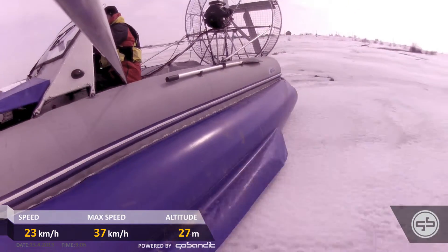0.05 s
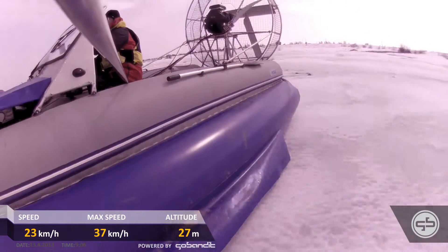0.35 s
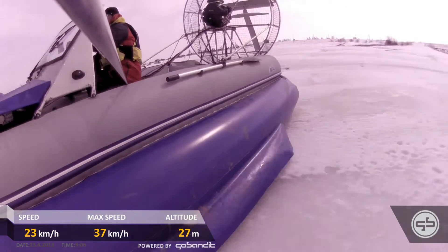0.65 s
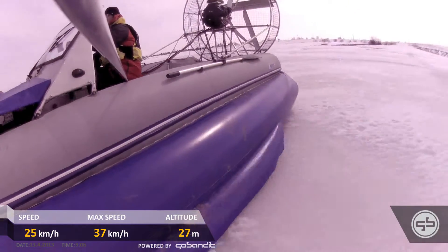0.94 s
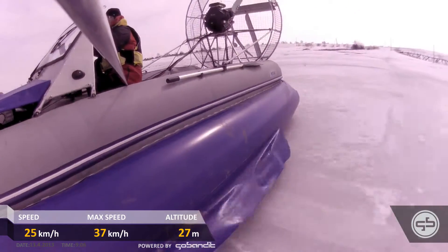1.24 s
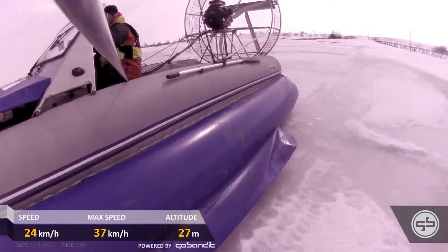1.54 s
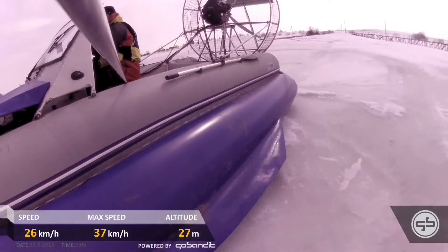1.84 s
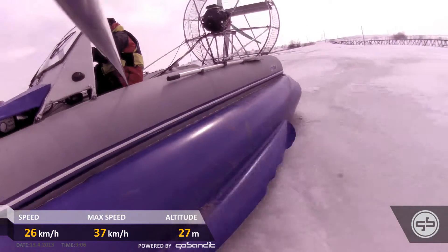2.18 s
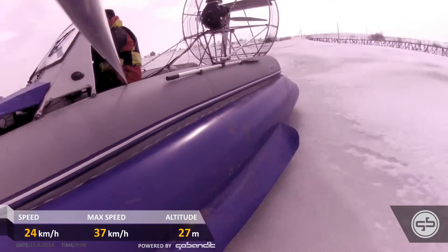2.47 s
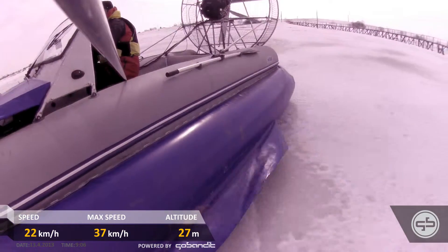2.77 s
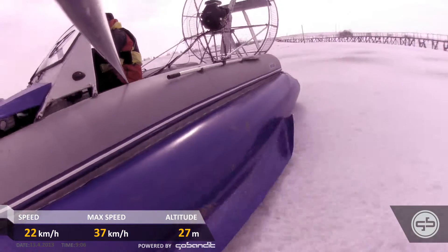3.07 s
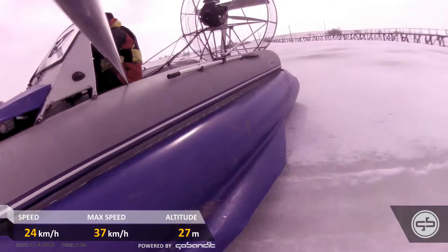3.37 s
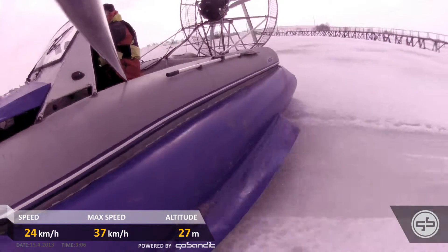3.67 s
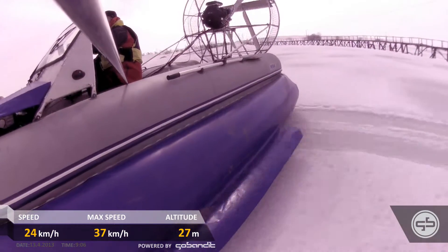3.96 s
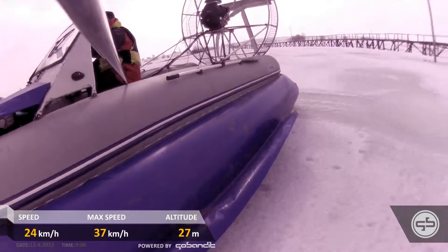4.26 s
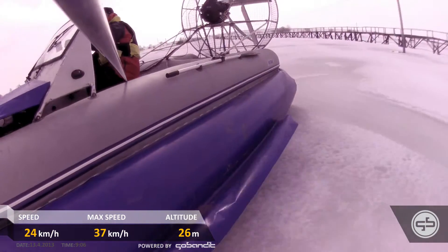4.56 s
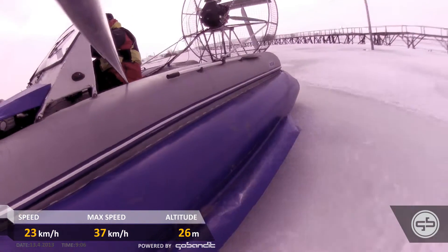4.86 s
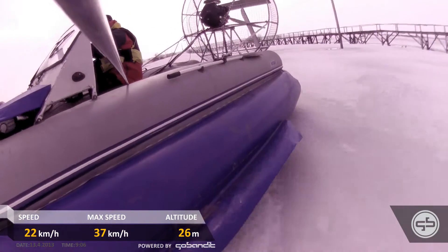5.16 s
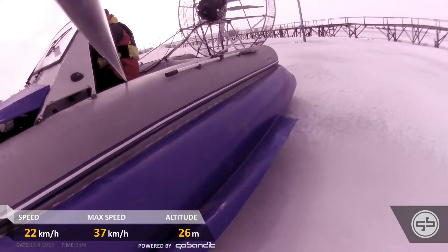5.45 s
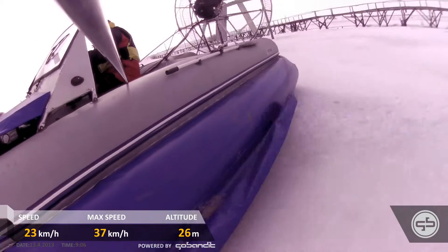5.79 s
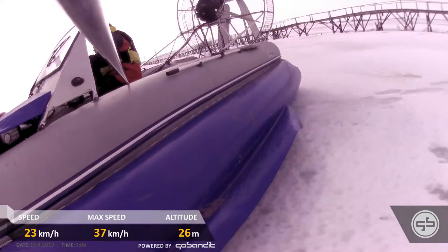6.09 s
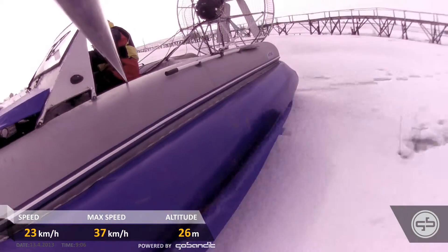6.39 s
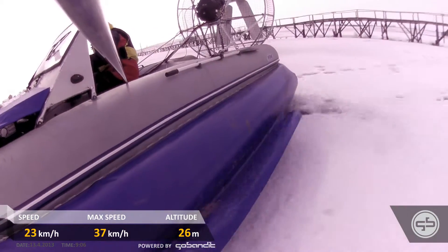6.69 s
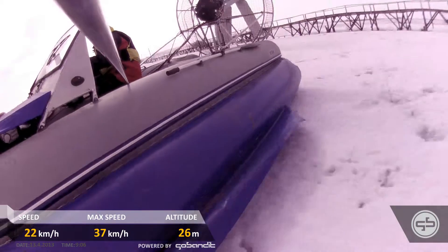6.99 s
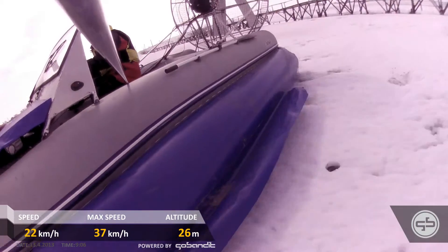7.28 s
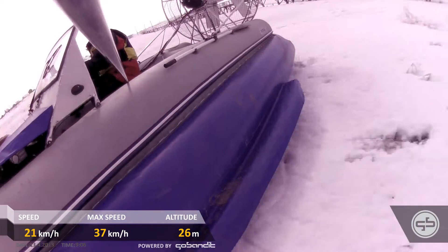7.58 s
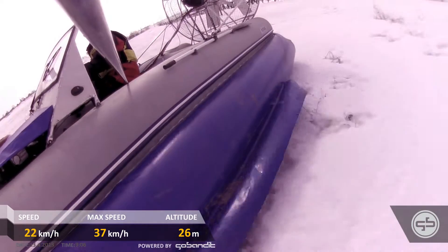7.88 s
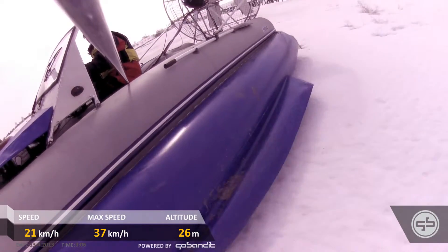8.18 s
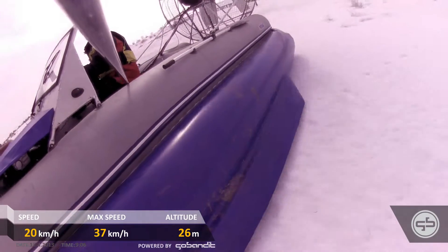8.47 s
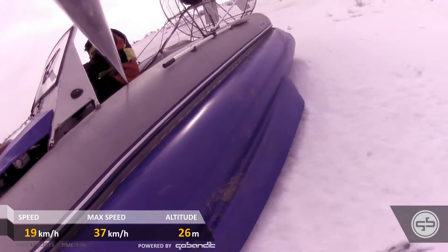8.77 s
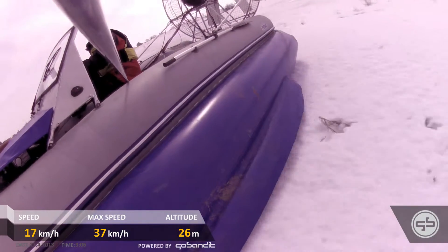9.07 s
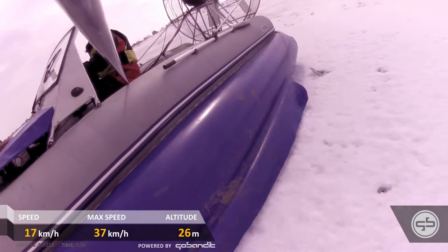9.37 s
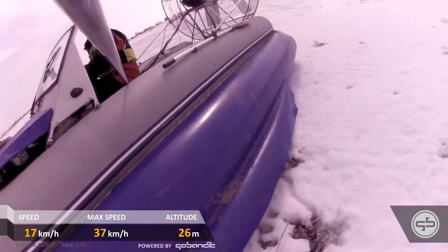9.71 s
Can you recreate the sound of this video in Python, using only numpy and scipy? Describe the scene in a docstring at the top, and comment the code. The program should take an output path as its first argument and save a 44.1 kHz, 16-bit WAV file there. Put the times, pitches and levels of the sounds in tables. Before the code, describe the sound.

A hovercraft's engine and propeller drone loudly and steadily while its skirt flutters and scrapes over ice and snow, with rattles and bumps.

```python
"""A hovercraft runs at steady throttle over ice and crusted snow, heard from a cased camera on its side.
From the start, engine and propeller drone, air buffets the hull and the skirt flutters on smooth ice.
The loose camera mount rattles, and from 1 s bumps jolt it; a limiter ducks everything after hard ones.
Just after 5 s the flutter dies away and the skirt scrapes over snow, where the bumps come thickest.
By 8 s the snow has thinned, and the drone carries on to the end."""
import sys
import numpy as np
from scipy import signal
from scipy.fft import rfft, irfft, next_fast_len
from scipy.io import wavfile
from scipy.ndimage import uniform_filter1d, minimum_filter1d

SR = 44100
rng = np.random.default_rng(int(sys.argv[2]) if len(sys.argv) > 2 else 0)


def waveform_to_disk(signal):
    """Save audio, clipped to [-1, 1], as 16-bit WAV at the path in sys.argv[1]."""
    frames = np.transpose(np.atleast_2d(signal))
    scaled = np.clip(frames, -1, 1) * 32767
    samples = np.round(scaled).astype(np.int16)
    wavfile.write(sys.argv[1], SR, samples)


N = 438354


def from_db(db):
    """Logarithmic level: 20 dB is a factor of ten in amplitude."""
    return 10 ** (np.asarray(db) / 20)


def unit_power(x):
    """Normalisation to a mean square of 1."""
    return x / np.sqrt(np.mean(x ** 2) + 1e-20)


def in_time(rows):
    """Linear interpolation of each column of a curve at every sample."""
    times, *columns = np.transpose(rows)
    return [np.interp(np.arange(N) / SR, times, column) for column in columns]


def drift(rate_hz):
    """Random modulation: low-passed noise with a spread of 1."""
    pole = np.exp(-80 * np.pi * rate_hz / SR)   # one step per 40 samples
    slow = signal.lfilter([1], [1, -2 * pole, pole * pole], rng.standard_normal(N // 40 + 2002))[2000:]
    return np.interp(np.arange(N) / 40, np.arange(len(slow)), unit_power(slow))


def coloured(x, spectrum):
    """Spectral shaping to unit power, falling 12 dB per octave beyond the ends of the spectrum."""
    size = next_fast_len(N)
    hz, db = np.transpose(spectrum)
    bins = np.maximum(np.arange(size // 2 + 1) * SR / size, 1)
    gain = from_db(np.interp(np.log(bins), np.log(hz), db))
    rolloff = np.minimum(bins / hz[0], 1) ** 2 * np.minimum(hz[-1] / bins, 1) ** 2
    return unit_power(irfft(rfft(x, size) * gain * rolloff, size)[:N])


def grains(per_s, spread_db):
    """Shot noise: random clicks of uneven size and sign."""
    sizes = from_db(spread_db * np.minimum(rng.exponential(1, N), 4)) * rng.choice([-1, 1], N)
    return sizes * (rng.random(N) < per_s / SR)


def ring(clicks, hz, t60_s):
    """Damped resonance: each click starts a decaying sine."""
    decay, angle = from_db(-60 / (t60_s * SR)), 2 * np.pi * hz / SR
    return signal.lfilter([0, np.sin(angle)], [1, -2 * decay * np.cos(angle), decay ** 2], clicks + 1e-18)


def swell(start, end, attack_s, release_s):
    """Exponential growth and decay on either side of a hold at 1 from start to end."""
    t = np.arange(N) / SR
    return np.exp(np.clip(np.minimum((t - start) / attack_s, (end - t) / release_s), -30, 0))


def around(events, attack_s, release_s):
    """Upper envelope of brief swells, one at each event."""
    out = np.zeros(N)
    for time_s, _ in events:
        out = np.maximum(out, swell(time_s, time_s, attack_s, release_s))
    return out


FIRINGS_PER_CYCLE = 6
# Engine speed, nearly steady: time_s, firing_hz
ENGINE_SPEED = [(0, 123.2), (.7, 123.7), (2.1, 123.6), (3.7, 123.25), (7.3, 123.2), (8.3, 124.2),
                (8.9, 124.25), (9.93, 123.6)]
def engine_cycles():
    """Phase as the integral of frequency: the count of engine cycles so far."""
    firing_hz, = in_time(ENGINE_SPEED)
    return np.cumsum(firing_hz) / SR / FIRINGS_PER_CYCLE


# Engine load, heard in the firing tone: time_s, level_db
ENGINE_LOAD = [(0, -18.5), (.3, -26), (1.35, -15.5), (2.1, -20.5), (3.1, -17.5), (3.6, -22.5),
               (4.12, -16.5), (4.9, -23), (5.9, -16), (6.27, -23.5), (6.95, -17.5), (8.1, -19),
               (9.93, -15.5)]
# Engine and propeller tones, topped by a faint whine: cycle_multiple, relative_db
ENGINE_ORDERS = [(1, -34), (2, -2), (3, -5), (4, -0.5), (5, -11.5), (6, 1), (7, -19.5), (8, -16),
                 (9, -15.5), (10, -13), (11, -8.5), (12, -21.5), (18, -27.5), (20, -34.5), (60, -39.5),
                 (72, -53)]
def engine(cycles, gain_db, waver, roughness, load_share):
    """Harmonics of one shaft: load swells the firing tone most, turbulent inflow shakes the high ones."""
    load_db, = in_time(ENGINE_LOAD)
    swing_db = load_db - load_db.mean()
    out = np.zeros(N)
    for multiple, db in ENGINE_ORDERS:
        phase = 2 * np.pi * (multiple * cycles + rng.random())
        unsteady = waver + roughness * multiple / FIRINGS_PER_CYCLE
        tone = (1 + unsteady * drift(3.5)) * np.sin(phase) + unsteady * drift(3.7) * np.cos(phase)
        follows = 1 if multiple == FIRINGS_PER_CYCLE else load_share
        out += from_db(db + follows * swing_db) * tone
    return np.sqrt(2) * from_db(load_db.mean() + gain_db) * out


# Spells of flapping on smooth ice: start_s, end_s, first_hz, last_hz, level_db
FLUTTER_SPELLS = [(0, 0.583, 35, 44, -11.5), (1.503, 2.605, 46, 28, -17), (3.15, 3.7, 34, 43, -11),
                  (4.244, 5.053, 40.5, 43, -10)]
def skirt_flutter(octave_db, waver_db):
    """Flutter: the rubber hem oscillates almost as a sine, with a weak octave."""
    out = np.zeros(N)
    for start, end, first_hz, last_hz, db in FLUTTER_SPELLS:
        flap_hz, = in_time([(start, first_hz), (end, last_hz)])
        phase = 2 * np.pi * np.cumsum(flap_hz) / SR
        flaps = np.sin(phase) + from_db(octave_db) * np.sin(2 * phase)
        out += from_db(db) * swell(start, end, attack_s=0.11, release_s=0.14) * flaps
    return np.sqrt(2) * from_db(waver_db * drift(8.6)) * out


# Spectrum of air on the hull: frequency_hz, density_db
BUFFET_SPECTRUM = [(18, 2.5), (30, -8), (48, -2), (65, -1.5), (80, -4.5), (100, -14), (140, -11),
                   (200, -23.5), (400, -37.5)]
def air_buffet(level_db, gust_db):
    """Pressure fluctuation: air on the hull makes a low rumble that swings slowly in level."""
    return from_db(level_db + gust_db * drift(2.6)) * coloured(rng.standard_normal(N), BUFFET_SPECTRUM)


# Ice giving way to crusted snow: time_s, snow_fraction
SNOW_FRACTION = [(5.1, 0), (5.4, 0.84), (7.3, 0.72), (8.1, 0.22)]
# How hard the skirt drags on the ground: time_s, drag_db
SKIRT_DRAG = [(0, 9), (.08, -3), (.5, -5), (.85, 1), (1.3, 1.5), (1.8, 1), (2.08, -6.5), (2.3, 0.5),
              (2.85, -1), (4.1, -.5), (5.1, -4), (5.33, 8.5), (5.55, 3), (6.2, 5.5), (6.45, 1.5),
              (7.88, 0.5), (8.03, -4), (8.4, 0.5), (9.93, 0.5)]
def ground_level(ice_db, snow_change_db, drag_share):
    """Contact excitation: a level in dB that follows the snow cover and the drag of the skirt."""
    cover, = in_time(SNOW_FRACTION)
    drag_db, = in_time(SKIRT_DRAG)
    return ice_db + snow_change_db * cover + drag_share * drag_db


# Ridges of snow under the skirt: time_s, rise_db
SNOW_RIDGES = [(.02, 7.5), (.92, 3.5), (1.33, 9), (1.8, 7), (2.31, 5), (2.6, 10.5), (4.45, 10), (5.92, 4.5),
               (7.2, 6), (7.9, 6.5), (8.821, 4), (9.68, 6.5)]
def ridge_rise():
    """Amplitude modulation: the rise in dB as the skirt rides on and off each ridge."""
    return sum(db * swell(s, s, attack_s=0.086, release_s=0.086) for s, db in SNOW_RIDGES)


# Spectrum of the struck skirt: frequency_hz, density_db
DRUM_SPECTRUM = [(60, 13.5), (130, 1.5), (215, 6.5), (300, -1), (390, 2), (490, -4.5), (620, -14),
                 (900, -20.5), (2000, -41)]
def skirt_drumming(heave_db, clump_db):
    """Membrane vibration: lumps of snow drum on the inflated skirt, harder at ridges and bumps."""
    level_db = ground_level(ice_db=-29, snow_change_db=1.9, drag_share=0.78) + ridge_rise()
    level_db += heave_db * around(GROUND_BUMPS, attack_s=0.035, release_s=0.0092)
    lumps = coloured(grains(per_s=500, spread_db=3.5), DRUM_SPECTRUM)
    return from_db(level_db + clump_db * drift(13.4)) * lumps


# Spectrum of the hem scraping: frequency_hz, density_db
SCRAPE_SPECTRUM = [(400, -3), (700, -5.5), (1000, -6), (1160, 2.5), (1250, 5.5), (1380, -7.5), (1520, -3.5),
                   (1800, -11.5), (2300, -8), (4000, -14.5)]
# Spectrum of the hem hissing: frequency_hz, density_db
HISS_SPECTRUM = [(1500, -6), (2200, 1), (3000, 4.5), (3900, 8), (4600, 2.5), (5200, 2), (5800, -5.5),
                 (7000, -0.5), (8200, -9.5), (9500, -26.5), (12300, -18), (15000, -29)]
def hem_friction(cycles, ridge_share):
    """Sliding friction: the hem drags over the crust, scraping and hissing in uneven, grainy rubs."""
    # the frame shakes with every firing, more with every second one, and once a cycle
    firing = 2 * np.pi * FIRINGS_PER_CYCLE * cycles
    throb = 0.62 * np.cos(firing / 2) + 0.39 * np.cos(firing) + 0.42 * np.cos(2 * np.pi * cycles)
    rub = drift(45.6)
    scrape_db = ground_level(ice_db=-46.5, snow_change_db=6.5, drag_share=0.32) + 3.13 * rub
    hiss_db = ground_level(ice_db=-39, snow_change_db=-1.14, drag_share=0.95) + 2.23 * rub
    hiss_db += ridge_share * ridge_rise() + 2.9 * throb
    scrape = from_db(scrape_db) * coloured(grains(per_s=9000, spread_db=2.5), SCRAPE_SPECTRUM)
    hiss = from_db(hiss_db) * coloured(grains(per_s=12000, spread_db=5.0), HISS_SPECTRUM)
    return scrape + hiss


# Spectrum of the limiter's fizz: frequency_hz, density_db
FIZZ_SPECTRUM = [(2000, 11), (4000, 2.5), (9000, -1.5), (12200, 2), (14100, 2), (15500, -22)]
def limiter_fizz(shake, level_db):
    """Zipper noise: faint, brief bursts of high fizz from the limiter on the strongest low peaks."""
    peaks = unit_power(np.clip(np.abs(unit_power(shake)) - 1.3, 0, 1))
    return from_db(level_db) * peaks * coloured(rng.standard_normal(N), FIZZ_SPECTRUM)


# Modes of the camera case: pitch_hz, relative_db, t60_s, nominal_delay_s
CASE_MODES = [(2200, -3, 0.014, 0.002665), (2390, 1.5, 0.013, 0.002335), (2840, 1.5, 0.0082, 0.00132),
              (3460, -9.5, 0.015, 0.0016), (3820, 1.5, 0.0087, 0.0012), (4530, -19.5, 0.021, .0003),
              (6000, -10.5, 0.0061, 0.00014), (6560, -19, 0.012, 0.0057), (8300, -30, 0.0033, 0.0071)]
def case_ringing(tap_samples, taps_db, scatter_db, lowest_hz):
    """Modal ringing with dispersion: bending waves bring each mode of a tap at its own delay."""
    count = len(tap_samples)
    path = rng.uniform(.3, 1.05, count)   # taps land nearer to or farther from the microphone
    out = np.zeros(N)
    for hz, db, t60_s, delay_s in CASE_MODES:
        strength = from_db(taps_db + db + scatter_db * rng.standard_normal(count))
        travel = delay_s * path * SR * rng.uniform(.85, 1.15, count)
        arrival = np.clip(tap_samples + travel, 0, N - 1).astype(int)
        out += ring(np.bincount(arrival, strength, N), hz, t60_s)
    # the stiff case passes little below its first mode
    return signal.sosfilt(signal.butter(6, lowest_hz, "high", fs=SR, output="sos"), out)


# Hard clacks of the mount on the case: time_s, relative_db
MOUNT_CLACKS = [(0.1146, -10), (0.4424, -15), (0.5909, -11), (0.7803, -18.5), (0.8333, -7), (1.041, -12.5),
                (1.0899, -15), (1.1556, -15), (1.4691, -17), (1.499, -18), (1.949, -14), (2.383, -12.5),
                (2.5775, -12.5), (2.806, -15), (3.053, -13.5), (3.3887, -18), (3.5227, -15.5),
                (3.7319, -11), (3.9089, -7.5), (4.1255, -19), (4.1718, -9), (4.3782, -15.5), (4.576, -13),
                (4.6052, -13), (4.7182, -16), (4.85, -14.5), (4.971, -16.5), (5.1886, -12), (5.4082, -9),
                (5.8386, -13), (5.889, -13.5), (6.1677, -12.5), (6.558, -16), (6.9588, -21), (7.259, -20),
                (7.4462, -17.5), (7.5043, -18), (7.7438, -17.5), (9.1561, -20)]
# Spells of hard rattling: start_s, end_s, tap_db
RATTLE_SPELLS = [(1.045, 1.757, -31.5), (2.81, 3.07, -36.5), (3.268, 3.42, -33), (3.83, 4.427, -30.5),
                 (6.12, 6.202, -26), (6.9, 7.246, -32)]
def mount_rattle(cycles, chatter_db, fitful_db, uneven_db, jitter_s, clack_gain_db, clack_lead_s):
    """Forced rattling: a loose joint taps the case on every second firing, harder after each clack."""
    faint = from_db(ground_level(ice_db=-40, snow_change_db=-13, drag_share=0.15))
    spells = sum(from_db(db) * swell(start, end, attack_s=0.02, release_s=0.011)
                 for start, end, db in RATTLE_SPELLS)
    chatter = from_db(chatter_db) * around(MOUNT_CLACKS, attack_s=0.001, release_s=0.079)
    rattle_db = 20 * np.log10(faint + spells + chatter) + fitful_db * drift(4)
    beats = np.flatnonzero(np.diff(np.floor(cycles * FIRINGS_PER_CYCLE / 2)))
    late, force = np.clip(rng.standard_normal((len(beats), 2)), -2, 2).T
    clacks_s, clacks_db = np.transpose(MOUNT_CLACKS)
    tap_samples = np.concatenate([(clacks_s - clack_lead_s) * SR, beats + late * jitter_s * SR])
    taps_db = np.concatenate([clacks_db + clack_gain_db, rattle_db[beats] + uneven_db * force])
    return case_ringing(tap_samples, taps_db, scatter_db=2.5, lowest_hz=2110)


# Bumps that jolt the mount: time_s, push_db
GROUND_BUMPS = [(0.999, 9), (1.871, 12.5), (2.747, 8), (3.975, -5.5), (5.571, 14.5), (6.007, 9), (6.115, 8),
                (6.324, 11), (6.688, 12.5), (6.834, 11), (7.078, 10), (7.284, 13.5), (7.752, -1),
                (7.952, 3), (8.183, -0.5), (8.916, 9), (9.027, 5.5)]
def bump_jolts(rise_s, stop_s, softening, crunch_db, thud_db):
    """Impulse excitation: each push builds and stops dead, with a hollow thud and a little crunch."""
    t, push = np.arange(N) / SR, np.zeros(N)
    hardest_db = max(db for _, db in GROUND_BUMPS)
    for time_s, db in GROUND_BUMPS:
        near = slice(round((time_s - .01) * SR), round((time_s + .005) * SR))
        age = (t[near] - time_s) * from_db(softening * (db - hardest_db))   # light bumps are slower
        push[near] += rng.choice([-1, 1]) * from_db(db) * np.exp(np.minimum(age / rise_s, -age / stop_s))
    crunch = from_db(crunch_db) * coloured(rng.standard_normal(N), SCRAPE_SPECTRUM)
    thud = from_db(thud_db) * ring(np.diff(push, prepend=0), hz=398, t60_s=0.0079)
    return push * (1 + crunch) + thud


def limiter(x, ceiling_db, release_db_per_s):
    """Look-ahead limiting: the gain drops just before each peak and climbs back steadily."""
    over_db = np.maximum(20 * np.log10(np.abs(x) + 1e-9) - ceiling_db, 0)
    ramp_db = release_db_per_s * np.arange(N) / SR
    held_db = np.maximum.accumulate(over_db + ramp_db, axis=-1) - ramp_db
    gain = minimum_filter1d(from_db(-held_db), size=9)
    return x * uniform_filter1d(gain, size=9)


def scene():
    """Superposition: all sources add at the camera, in one channel."""
    cycles = engine_cycles()
    shake = engine(cycles, gain_db=-1.0, waver=0.2, roughness=0.06, load_share=0.5)
    shake += skirt_flutter(octave_db=-16, waver_db=0.5)
    shake += air_buffet(level_db=-17, gust_db=1)
    shake += skirt_drumming(heave_db=1, clump_db=2.8)
    friction = hem_friction(cycles, ridge_share=0.47)
    rattle = mount_rattle(cycles, chatter_db=-30.5, fitful_db=3.0, uneven_db=3.0,
                          jitter_s=0.0018, clack_gain_db=-4.0, clack_lead_s=0.00027)
    jolts = bump_jolts(rise_s=0.00073, stop_s=0.00047, softening=0.33, crunch_db=-22, thud_db=-2.5)
    return (shake + friction + rattle + jolts + limiter_fizz(shake, level_db=-54.0))[None]


def record(dry):
    """Peak limiting, then band limiting by a steep low-pass filter."""
    limited = limiter(dry, ceiling_db=-2.0, release_db_per_s=173)
    stopband_hz = 16300
    return signal.sosfilt(signal.cheby2(14, 70, stopband_hz, fs=SR, output="sos"), limited)


dry = scene()
out = record(dry)
waveform_to_disk(out)
```